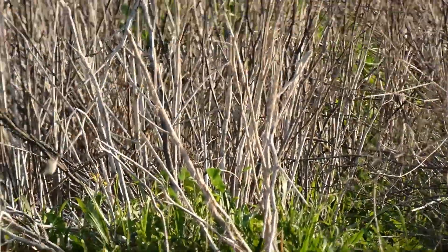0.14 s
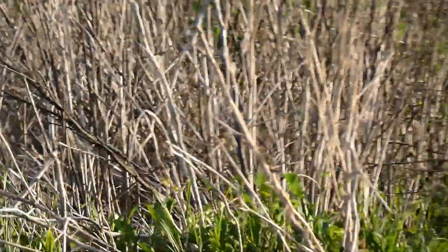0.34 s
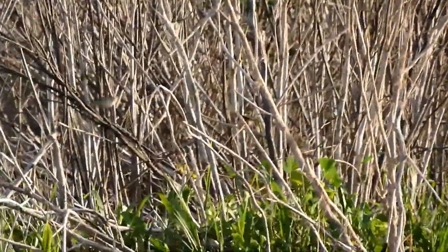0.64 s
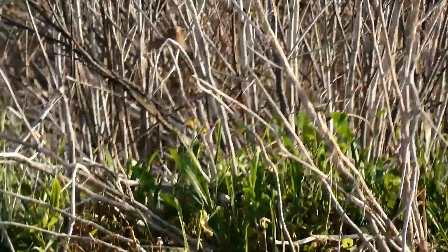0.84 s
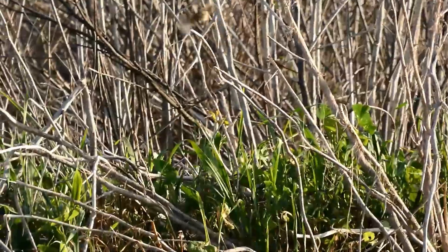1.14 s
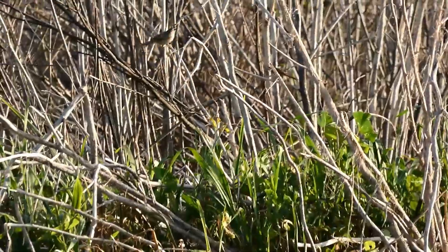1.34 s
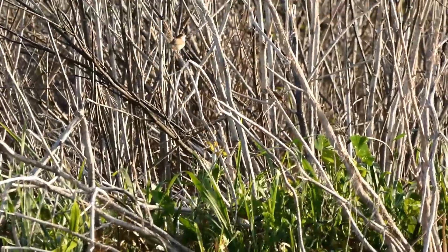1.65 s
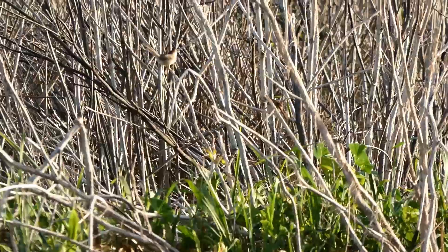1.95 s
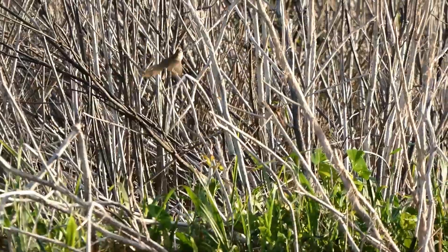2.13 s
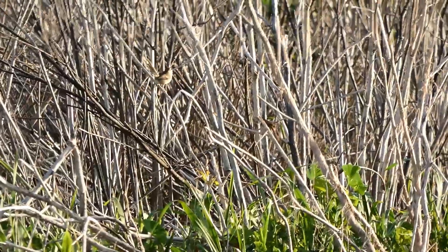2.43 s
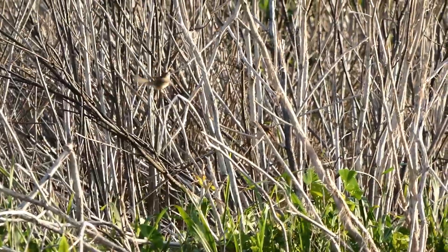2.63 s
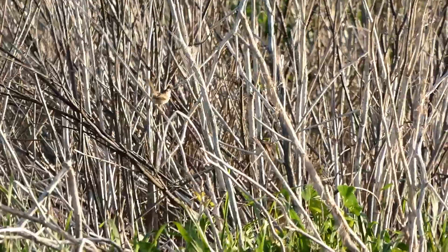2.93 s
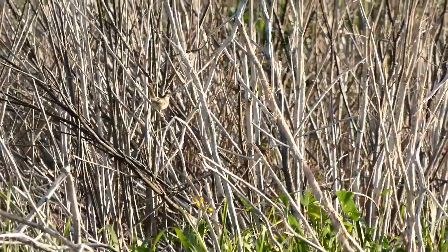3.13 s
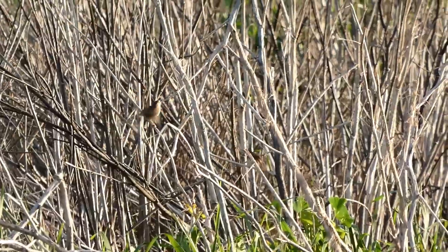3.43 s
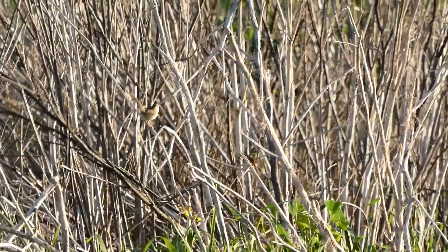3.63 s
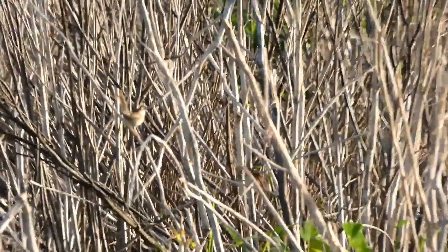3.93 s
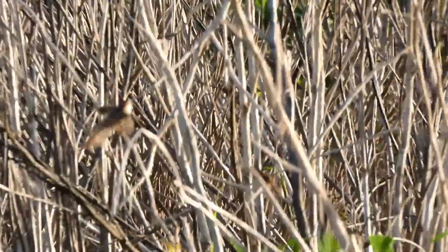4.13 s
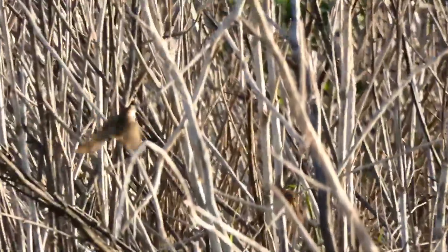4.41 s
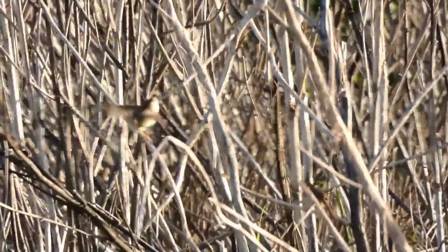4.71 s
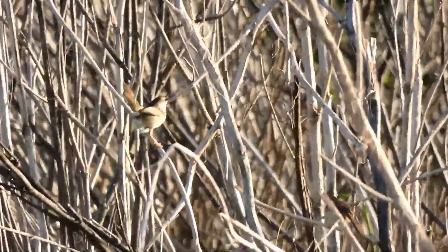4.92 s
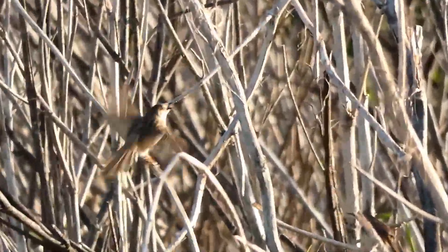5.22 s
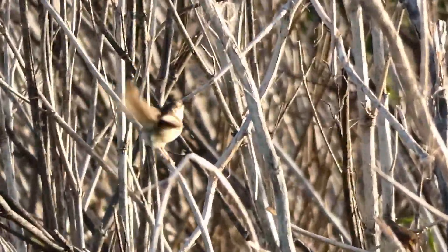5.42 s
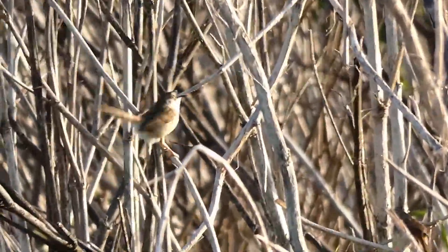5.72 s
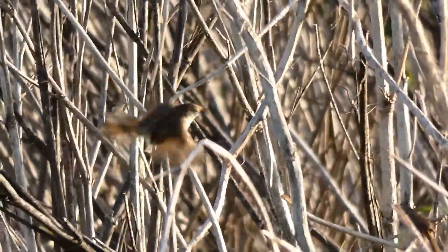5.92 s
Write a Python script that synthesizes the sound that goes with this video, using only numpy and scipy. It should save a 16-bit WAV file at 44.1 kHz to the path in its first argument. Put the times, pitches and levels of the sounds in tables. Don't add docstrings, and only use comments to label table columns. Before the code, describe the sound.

A small bird repeats a fast, high trilling phrase in a dry reedbed, while close camera lens motors tick, hum and whirr over faint open air.

```python
import sys
import numpy as np
from scipy import signal
from scipy.fft import rfft, irfft
from scipy.io import wavfile
from scipy.ndimage import uniform_filter1d

SR = 44100
rng = np.random.default_rng(int(sys.argv[2]) if len(sys.argv) > 2 else 0)


def invert_db(x):
    u = np.asarray(x, float) / 20
    return 10 ** u


def generate_wav(signal):
    frames = np.transpose(np.atleast_2d(signal))
    scaled = np.clip(frames, -1, 1) * 32767
    pcm = np.round(scaled).astype(np.int16)
    wavfile.write(sys.argv[1], SR, pcm)


N = 267246
CLOCK = np.arange(N) / SR
RUN_OUT_S = 4.9

# (frequency [Hz], density [dB per Hz])
AIR_COLOUR = [(25, -19), (150, -11.5), (240, -6.5), (373, 0.5), (936, -8.5), (1190, -25), (1520, -13),
              (2410, -12.5), (3430, -10.5), (5280, -11), (7500, -5.5), (10000, -18.5), (13000, -22.5),
              (15500, -28), (17000, -34)]
# (frequency [Hz], likeness [0..1])
AIR_LIKENESS = [(60, 0.49), (180, 0.88), (550, 0.85), (1650, 0.17), (4970, 1), (15000, 0.26)]
# (frequency [Hz], width [Hz], level [dB])
ENGINES = [(143.7, 7.5, -73.5), (137.4, 69, -71)]

# (frequency [Hz], width [Hz], tick level [dB], tick level with lens run out [dB], motor hum level [dB])
HOUSING_MODES = [(1187.2, 76.6, -2, -1, 33), (1252, 77, -2.5, -3, -17), (1336.6, 39, -1.5, 8.5, 17),
                 (1021, 71, -9.5, 5.5, -29), (1710, 84, 5, -16, 16)]
# (frequency [Hz], width [Hz], tick level [dB], zoom motor level [dB])
LENS_MODES = [(2432, 115, 2.5, 3.5), (2836, 36, 0.5, 15), (2915, 30, -14, 15.5), (3106, 214, -8, 2.5),
              (4508, 71, -9, 2.5), (4220, 790, -10.5, -57), (2080, 740, -23, -47), (9930, 520, -14.5, -42),
              (2590, 352, -1.5, -12)]
# (frequency [Hz], width [Hz], level [dB])
BARREL_MODES = [(301.4, 82, 11.5), (447, 14, 13.5), (572.4, 9.8, 10), (740, 27, -39)]
# (frequency [Hz], width [Hz], level [dB])
STEP_MODES = [(396, 65, -14.5), (494, 98, -15.5), (640, 230, -16.5), (900, 135, -13.5), (1748, 230, -9),
              (2740, 293, -9)]
# (frequency [Hz], width [Hz], level [dB])
RUN_OUT_HUM_MODES = [(1305, 55, -59.5), (1097, 40, -64.5)]

# (time [s], housing hum level [dB])
MOTOR_LOAD = [(0.0, -60), (.15, -57), (.25, -40.5), (.29, -49.5), (.81, -55.5), (.89, -49), (.93, -58.5),
              (1.3, -66), (3.5, -63), (3.8, -52.5), (3.88, -43.5), (4.08, -49), (4.29, -58), (4.46, -55.5),
              (4.62, -57), (4.89, -50.5), (5.03, -68), (6.06, -64)]
# (start [s], stop [s], rise [s], surge level [dB], cruise level [dB])
ZOOM_RUNS = [
    (0.171, 0.765, 0.3, -46.5, -49.5),
    (3.833, 4.824, 0.011, -34.5, -49.5),
]
# (time [s], rate [steps/s])
MOTOR_SPEED = [
    (0, 120),
    (2.0, 91),
    (3.8, 56),
    (4.3, 280),
    (6.1, 670),
]
# (time [s], level [dB])
GEAR_BITE = [(.2, -7), (.33, 0.5), (.37, -2), (.45, 2.5), (.55, 2), (.64, 1), (.68, -9), (.75, 4),
             (3.85, -3), (3.95, -0.5), (4.05, 2), (4.15, -3), (4.3, -0.5), (4.45, 0.5), (4.6, -6),
             (4.8, -3)]
# (time [s], level [dB])
UPPER_LENS_SLACK = [(0, -4.5), (3.8, 2), (3.83, 9.5), (4.45, 2), (4.6, 7.5)]
# (time [s], level [dB])
BARREL_CATCHES = [
    (.24, -55),
    (0.45, -52.5),
    (0.558, -54),
    (.75, -60.5),
    (3.86, -45),
    (4.08, -51.5),
    (4.301, -63),
    (4.42, -52),
    (4.79, -54),
]

# (time [s], peak level [dB])
FOCUS_HUNT = [(0.8414, -43), (0.857, -38), (0.8792, -33), (0.8993, -42), (0.9401, -36), (0.9726, -32.5),
              (1.007, -37), (1.0398, -33), (1.1416, -37), (1.173, -33), (1.375, -38.5), (1.4406, -31.5),
              (1.509, -39.5), (1.5403, -31), (1.642, -40), (1.6747, -30), (1.775, -40), (1.808, -30),
              (1.941, -37.5), (2.0722, -33), (2.1012, -36.5), (2.132, -29), (2.2016, -37), (2.267, -30),
              (2.3004, -49), (2.334, -36.5), (2.366, -27.5), (2.4002, -35.5), (2.4679, -28.5),
              (2.5005, -35.5), (2.5674, -29.5), (2.6348, -36.5), (2.667, -27.5), (2.8025, -36.5),
              (2.8334, -29), (2.866, -35), (2.899, -29.5), (2.9337, -38.5), (3.0011, -31), (3.034, -37.5),
              (3.1, -29.5), (3.1347, -37.5), (3.234, -29), (3.268, -36.5), (3.3342, -30), (3.4022, -40),
              (3.4344, -30), (3.469, -37)]
FOCUS_CREEP = [(0.125, -40.5), (0.1866, -34.5), (0.2202, -36.5), (0.288, -42), (0.3887, -45), (0.421, -52),
               (0.4972, -45), (0.539, -42), (0.567, -46), (0.6872, -47), (0.726, -46), (0.79, -44),
               (0.822, -46), (3.548, -38), (3.5761, -37.5), (3.606, -41), (3.639, -31), (3.6722, -34.5),
               (3.7062, -35), (3.7404, -29.5), (3.7738, -32), (3.8064, -29.5), (3.9084, -38), (4.0117, -43),
               (4.0702, -48), (4.1337, -47), (4.277, -45), (4.5465, -43), (4.7488, -44), (4.784, -44),
               (4.818, -40), (4.8516, -48), (4.896, -39), (4.9219, -32.5), (4.953, -42.5)]
FOCUS_STRAIN = [(0.0563, -33), (0.2552, -33), (0.3197, -37.5), (.354, -37.5), (0.6462, -39), (3.8366, -27),
                (3.8764, -33), (3.9313, -33), (3.9739, -34.5), (4.043, -30), (4.091, -41), (4.308, -49)]
FOCUS_REACH = [(5.0983, -42), (5.157, -38), (5.189, -37), (5.2869, -38.5), (5.3616, -35.5), (5.4279, -36.5),
               (5.465, -38.5), (5.499, -37.5), (5.564, -39), (5.663, -38), (5.697, -40), (5.7297, -37.5),
               (5.8314, -39.5), (5.928, -38.5), (5.962, -39.5)]
STEP_BRIGHTNESS = [-15, -21.5, -12.5, -10]

# (whistle peak [s], whistle level [dB], rising note level [dB])
FAR_SONG = [(0.142, -48, -46.5), (0.4239, -54, -57), (0.715, -50.5, -56), (1.0006, -42, -47),
            (1.299, -42, -48), (1.592, -64, -57), (1.8932, -38.5, -44), (2.173, -38.5, -43),
            (2.462, -40, -45), (2.745, -37.5, -42), (3.0402, -39.5, -45), (3.325, -43, -43),
            (3.615, -47.5, -39.5), (3.904, -36, -40), (4.1895, -39.5, -39), (4.489, -35, -42),
            (4.7784, -41, -45), (5.066, -32.5, -38), (5.371, -37, -42)]
# (start from whistle peak [s], length [s], start, middle, end pitch [Hz], level [dB])
FAR_RATTLE_NOTES = [
    (-.05, .005, 4800, 5500, 5900, -15),
    (-.043, .005, 5800, 5000, 4300, -17),
    (-.037, .006, 4800, 3900, 4200, -9),
    (-.029, .007, 4800, 3850, 4000, -7),
]

# (time [s], level [dB], frequency [Hz], decay [s])
HOUSING_KNOCKS = [
    (0.182, -33.5, 640, 0.0033),
    (0.234, -25.5, 610, 0.0056),
    (0.166, -40.5, 344, 0.013),
    (0.232, -28.5, 335, 0.0072),
    (3.834, -23.5, 425, 0.0063),
    (4.034, -55, 900, 0.0059),
]

# (middle [s], length [s], level [dB])
STEM_GUSTS = [(1.29, 0.033, -55), (1.492, 0.15, -55.5), (1.644, 0.11, -56.5), (2.067, 0.054, -58),
              (2.194, 0.048, -52), (2.317, 0.14, -56.5), (2.571, 0.11, -56.5), (2.931, 0.16, -50),
              (3.268, 0.15, -56.5), (3.407, 0.15, -60.5), (3.653, 0.14, -60.5), (3.922, 0.17, -50),
              (4.8, 0.32, -61), (5.06, 0.058, -61), (5.238, 0.078, -52.5), (5.57, 0.15, -58),
              (6.025, 0.031, -73)]
# (frequency [Hz], level [dB])
RUB_COLOUR = [(2500, -60), (4000, -32), (6000, -16.5), (9900, -12.5), (12500, -19), (15000, -31),
              (17000, -52)]
# (time [s], level [dB], left over right [dB])
STEM_CRACKS = [(0.181, -29.5, -1), (0.2364, -35, -1), (0.6469, -28, 1), (1.193, -20.5, -3.5),
               (1.276, -43, -3), (1.291, -33, -5), (1.099, -50, -2), (1.208, -37, -3), (1.626, -37, -2),
               (1.643, -44, 0), (1.6627, -31.5, -4), (1.717, -43, -4), (1.959, -43, -5),
               (1.7562, -29.5, -4), (2.0373, -39, -7), (2.07, -42, -3.5), (2.177, -46, -7),
               (2.1936, -28, -4), (2.212, -30, -4), (2.2595, -41, -5), (2.881, -35, -5), (2.918, -27, -5),
               (2.942, -34, -12), (2.983, -40.5, -8), (3.836, -30, -2), (4.0348, -25, 3), (4.091, -30, -1),
               (4.667, -33, -5), (4.715, -38, -4), (4.7984, -42, -2), (4.805, -40, -5), (4.809, -44, -3),
               (4.831, -32, -6), (4.837, -40, -6), (4.846, -47, -4), (4.962, -51, 0), (5.563, -37, -4),
               (4.8844, -38, -3.0), (5.0757, -32.5, -6), (5.553, -34, -5), (5.638, -39.5, -2.5),
               (6.02, -42, -6), (6.034, -44, -6), (6.057, -38, -2)]

# (start [s], length [s], frequency [Hz], level [dB])
BARREL_GROANS = [(0.308, 0.11, 617, -56.5), (0.38, 0.11, 292, -58), (0.447, 0.085, 402.4, -54.5),
                 (0.51, 0.067, 567, -52.5), (0.529, 0.097, 317.7, -49.5), (.565, 0.053, 457, -50),
                 (0.641, 0.11, 452, -53.5), (0.672, 0.063, 600, -56), (0.744, 0.034, 352, -50),
                 (0.802, 0.25, 635, -58.5), (3.469, 0.021, 312, -52.5), (3.529, 0.14, 638, -56),
                 (3.524, 0.092, 278, -55), (3.684, 0.087, 627, -60), (3.85, 0.12, 313, -42),
                 (3.898, .1, 428.6, -49), (4.004, 0.025, 568, -45), (4.04, 0.082, 490, -49.5),
                 (4.072, 0.044, 289, -58), (4.123, 0.071, 418, -51.5), (4.137, 0.043, 281, -50.5),
                 (4.301, 0.096, 305.5, -48), (4.414, 0.047, 591, -46.5), (4.496, 0.1, 315, -47.5),
                 (4.726, 0.092, 432, -58), (4.79, 0.04, 315, -56), (4.834, 0.14, 617, -51.5)]

# (first pulse [s], last pulse [s], pulses [count])
TRILL_BOUTS = [
    (.8375, 1.0125, 10),
    (1.2228, 1.4495, 12),
    (4.4625, 4.667, 11),
    (4.9475, 5.205, 13),
]
# (first pulse level [dB], full level [dB], full pitch [Hz])
TRILL_VOICE = [
    (-46, -37, 4130),
    (-45, -35.5, 4115),
    (-45, -37, 3990),
    (-37, -31, 4150),
]

# (first snap [s], trill level [dB], snaps level [dB], whistle level [dB])
NEAR_SONG = [(1.4948, -25, -25.5, -27), (1.861, -25.5, -25.5, -27.5), (2.227, -23.5, -26.5, -29.5),
             (2.5939, -23, -23.5, -29.5), (2.958, -24, -25, -29), (3.3236, -23.5, -24.5, -29),
             (3.6884, -22.5, -24.5, -28.5), (4.0509, -23, -22.5, -29.5), (4.416, -22, -24, -28),
             (4.7814, -22, -21.5, -28), (5.147, -20.5, -21, -24), (5.513, -21, -22, -26),
             (5.877, -18.5, -21, -25.5)]
RATTLE_EFFORT = [6.5, 7, 8, 5, 1, 5, 5, -4, -0.5, -2, 0, 4.5, 5]
# (start from first snap [s], length [s], start, middle, end pitch [Hz], level [dB])
SNAP_NOTES = [
    (-.017, .014, 6650, 6900, 7050, -25),
    (-.002, .0035, 5000, 6300, 7200, -1),
    (.004, .0035, 6700, 5900, 4700, -5),
    (.0185, .005, 4100, 5050, 5900, -12),
    (.025, .0045, 5900, 4800, 3700, -19),
    (.034, .006, 5700, 3900, 4900, -24),
    (.0445, .007, 5700, 3850, 4800, -20),
    (.055, .007, 5500, 3900, 4800, -16),
]

# (frequency [Hz], width [Hz], level [dB])
PORT_NOTCHES = [(2170, 150, -8), (3420, 360, -13), (7450, 1300, -21)]


def evened(x):
    return x / np.sqrt(np.mean(x ** 2) + 1e-20)


def smooth(x, size):
    return uniform_filter1d(uniform_filter1d(x, size=size), size=size)


def read(points, hz):
    f, value = np.transpose(points)
    return np.interp(np.log(hz + 1), np.log(f + 1), value)


def over_time(table):
    return np.interp(CLOCK, *np.transpose(table))


def add(mix, s, sound):
    part = mix[max(round(s * SR), 0):][:len(sound)]
    part += sound[:len(part)]


def ring(x, hz, width):
    for wide in (abs(width), 3 * abs(width)):
        pole = np.exp((-np.pi * wide + 2j * np.pi * hz) / SR)
        x = 2 * signal.lfilter([1 - abs(pole)], [1, -pole], x).real
    return x


def sway(x, hz, width):
    drift = evened(smooth(rng.standard_normal(N), 2500))
    turn = np.exp(2j * np.pi * np.cumsum(hz * (1 + .004 * drift)) / SR)
    x = x / turn
    for wide in (abs(width), 3 * abs(width)):
        r = np.exp(-np.pi * wide / SR)
        x = signal.lfilter([1 - r], [1, -r], x)
    return 2 * (x * turn).real


def coloured(spectrum, same, patchy_db, size):
    hz = np.fft.rfftfreq(size, 1 / SR)
    a, b, c, d, patches = rng.standard_normal((4 * N // size + 5, len(hz), 5)).T
    patches = uniform_filter1d(patches, size=8, axis=0)
    patches = evened(uniform_filter1d(patches, size=8, axis=1))
    same = np.clip(same(hz), -1, 1)[:, None]
    left = a + 1j * b
    right = same * left + np.sqrt(1 - same ** 2) * (c + 1j * d)
    z = np.array([left, right]) * invert_db(read(spectrum, hz)[:, None] + patchy_db * patches)
    return evened(signal.istft(z, nperseg=size, noverlap=size - size // 4)[1][:, :N])


def voiced(hz):
    return np.sin(2 * np.pi * (np.cumsum(hz) / SR + rng.random()))


def note(length, hz0, hz1, hz2, db, peak=0.5, blunt=1.0):
    u = np.linspace(0, 1, max(round(length * SR), 8))
    bend = np.polyfit([0, .5, 1], [hz0, hz1, hz2], 2)
    hz = np.polyval(bend, u) * (1 + 0.006 * rng.normal())
    rise_fall = np.interp(u, [0, np.clip(peak, .05, .95), 1], [0, 1, 0])
    return invert_db(db) * np.sin(np.pi / 2 * rise_fall) ** blunt * voiced(hz)


def reeds(x, t60, early):
    at = np.arange(40, SR // 2 - 30, 24) + rng.integers(0, 24, (2, (SR // 2 - 71) // 24 + 1))
    taps, t = np.zeros((2, SR // 2)), CLOCK[:SR // 2]
    np.put_along_axis(taps, at, rng.choice([-1., 1.], at.shape), 1)
    taps = taps[:1] + 0.11 * taps[1:] * [[1], [-1]]
    taps *= invert_db(-60 * t / t60) + early * np.exp(-t / 0.014)
    return signal.fftconvolve(x[None], taps / np.linalg.norm(taps[0]), axes=1)[:, :N]


def air():
    hush = invert_db(-58.5) * coloured(AIR_COLOUR, lambda hz: read(AIR_LIKENESS, hz), patchy_db=2.4, size=2048)
    drone = sum(invert_db(db) * evened(ring(rng.standard_normal(N), hz, width)) for hz, width, db in ENGINES)
    return hush + drone


def motor_hum(grind, lumps):
    load_db = over_time(MOTOR_LOAD)
    shell = evened(sum(invert_db(db) * ring(lumps * grind[1], hz, width) for hz, width, *_, db in HOUSING_MODES))
    pair = lumps * (grind[3] + 0.29 * grind[4] * np.array([[1], [-1]]))
    murmur = evened(ring(pair, 471, 270) + ring(pair, 573.0, 62) + 0.91 * ring(pair, 754, 75))
    run_out = sum(invert_db(db) * evened(ring(lumps * grind[0], hz, width)) for hz, width, db in RUN_OUT_HUM_MODES)
    murmur_db = -63 + 0.81 * (load_db + 60.5)
    return (CLOCK > RUN_OUT_S) * run_out + invert_db(load_db) * shell + invert_db(murmur_db) * murmur


def effort():
    out = np.zeros(N)
    for start, stop, rise, surge_db, cruise_db in ZOOM_RUNS:
        sinking_db = surge_db - 31 * np.maximum(CLOCK - start - rise, 0)
        db = np.maximum(sinking_db, cruise_db)
        db -= 9 * np.clip(1 - (CLOCK - start) / rise, 0, 1)
        out += invert_db(db) * (CLOCK > start) * np.clip((stop - CLOCK) / 0.0066, 0, 1)
    return out


def catches():
    rise_db_s, fall_db_s = 304, 89
    swell = sum(invert_db(db - np.maximum(rise_db_s * (s - CLOCK), fall_db_s * (CLOCK - s)))
                for s, db in BARREL_CATCHES)
    return swell * (effort() > 0)


def zoom(grind, lumps):
    turns = np.cumsum(over_time(MOTOR_SPEED)) / SR
    steps = np.exp(-(turns % 1) / 0.35) * grind[0] + .9 * grind[1]
    slack = invert_db(over_time(UPPER_LENS_SLACK))
    whine = np.zeros(N)
    for k, (hz, width, _, db) in enumerate(LENS_MODES[:5]):
        mode = sway(steps, hz, max(width, 30 + 45 * (hz > 4000)))
        damping = slack if 3000 < hz < 3300 else 1
        whine += invert_db(db) * np.roll(lumps, 9000 * k) ** .3 * damping * mode
    drone = evened(sum(invert_db(db) * ring(grind[2], hz, width) for hz, width, db in BARREL_MODES))
    hiss = coloured(RUB_COLOUR, lambda hz: .75 + 0 * hz, patchy_db=.8, size=256)
    hiss += 0.15 * evened(ring(grind[4], 15300, 500))
    whirr = effort() * invert_db(over_time(GEAR_BITE)) * evened(whine)
    return whirr + catches() * drone + invert_db(-39.5) * effort() ** 0.42 * hiss


def lens_motors():
    grind = rng.standard_normal((5, N))
    lumps = invert_db(2.5 * evened(uniform_filter1d(grind[2], size=1500)))
    return motor_hum(grind, lumps) + zoom(grind, lumps)


def focus_steps():
    kinds = zip((FOCUS_HUNT, FOCUS_CREEP, FOCUS_STRAIN, FOCUS_REACH), STEP_BRIGHTNESS)
    return [(s + 0.001039, db + 2.5, bright_db) for table, bright_db in kinds for s, db in table]


def focus():
    shove, tick = np.zeros(N), np.zeros(N)
    t = np.arange(0, .014, 1 / SR)
    for s, db, bright_db in focus_steps():
        chance = rng.standard_normal(len(t))
        buzz = np.sin(2 * np.pi * 1200 * t) + 0.5 * chance
        add(shove, s - .005, invert_db(db + 4.0) * buzz * (t / 0.0038) ** 2 * np.exp(2 - t / 0.0017))
        add(tick, s - .0027, invert_db(db + bright_db + 22.0) * chance * t / 0.0032 * np.exp(1 - t / 0.0014))
    out = np.zeros(N)
    for hz, width, db, out_db, _ in HOUSING_MODES:
        out += ring(shove * invert_db(np.where(CLOCK < RUN_OUT_S, db, out_db)), hz, width)
    blow = np.roll(tick, 50) + 0.39 * np.roll(tick, 350)
    for hz, width, db in STEP_MODES:
        out += invert_db(db + 9.0) * ring(blow, hz, width)
    for hz, width, db, _ in LENS_MODES:
        out += invert_db(db) * ring(tick, hz, width)
    return out


def far_bird():
    out = np.zeros(N)
    for s, whistle_db, rise_db in FAR_SONG:
        add(out, s - .088, note(.027, 6050, 6280, 6550, rise_db, peak=.6, blunt=1.3))
        for at, length, hz0, hz1, hz2, db in FAR_RATTLE_NOTES:
            add(out, s + at, note(length, hz0, hz1, hz2, db + whistle_db, blunt=0.38))
        add(out, s - .018, note(0.0249, 5413, 5180, 5120, whistle_db, peak=0.91, blunt=1.3))
    return out


def knocks():
    out, t = np.zeros(N), np.arange(0, .06, 1 / SR)
    for s, db, hz, decay in HOUSING_KNOCKS:
        thud = np.sin(2 * np.pi * hz * t) + 0.9 * ring(rng.standard_normal(len(t)), 580, 1650)
        add(out, s, invert_db(db) * thud * t / decay * np.exp(1 - t / decay * 2))
    return out - smooth(out, 150)


def gusts():
    out = np.zeros(N)
    for s, length, db in STEM_GUSTS:
        add(out, s - length * .7, invert_db(db) * np.hanning(round(length * 1.4 * SR)))
    return out


def stems():
    grain_db = 1.6 * uniform_filter1d(rng.exponential(1, N) ** 2, size=30)
    flutter_db = 4 * evened(ring(rng.standard_normal(N), 40, 60))
    rub = coloured(RUB_COLOUR, lambda hz: 0.61 + 0 * hz, patchy_db=3.0, size=256)
    rub = evened(invert_db(grain_db + flutter_db) * rub)
    out = rub * gusts() * invert_db(np.array([[-1.3], [1.3]]))
    t = np.arange(0, .004, 1 / SR)
    for s, db, pan_db in STEM_CRACKS:
        chance = rng.standard_normal((2, len(t)))
        burst = (chance[0] + .5 * chance[1] * [[1], [-1]]) * np.exp(-t / 0.0006)
        snap = ring(burst, 9700, 3600)
        add(out[0], s, invert_db(db + pan_db / 2) * snap[0])
        add(out[1], s, invert_db(db - pan_db / 2) * snap[1])
    return out


def groans():
    out = np.zeros(N)
    for s, length, hz, db in BARREL_GROANS:
        tone = note(length, hz * .99, hz * 1.01, hz * 0.957, db, peak=0.25, blunt=0.41)
        waver_db = 4.9 * evened(uniform_filter1d(rng.standard_normal(len(tone)), size=400))
        add(out, s, tone * invert_db(waver_db))
    return out


def third_bird():
    out = np.zeros(N)
    for (first, last, count), (first_db, full_db, full_hz) in zip(TRILL_BOUTS, TRILL_VOICE):
        count = int(count)
        times = np.linspace(first, last, count) + 0.00037 * rng.standard_normal(count)
        for k, s in enumerate(times):
            s += .0025 * (k == 0)
            db = full_db + (first_db - full_db) * np.exp(-k) + .5 * rng.normal()
            hz = full_hz * (1 - .075 * np.exp(-k / 2.2) + .006 * rng.normal())
            add(out, s - .0045, note(.0095, .83 * hz, 1.01 * hz, .85 * hz, db, blunt=1.5))
            add(out, s - .009, note(.006, .92 * hz, 1.05 * hz, 1.3 * hz, db - 19))
            add(out, s + .003, note(.005, 1.25 * hz, 1.03 * hz, .9 * hz, db - 19))
            rasp = ring(rng.standard_normal(1150), 4900, 1350) * np.hanning(1150)
            add(out, s - .0235, invert_db(db - 2.0) * rasp)
    return out


def trill_pulse(db):
    t = np.arange(0, .0112, 1 / SR)
    hz = 5460 + 1500 * np.exp(-t / .0012) - 900 * np.exp(-t / .0004) + 20 * rng.normal()
    flutter = 1 + .12 * np.sin(2 * np.pi * (230 * t + rng.random()))
    swell = signal.windows.tukey(len(t), .4) * (.9 + 10 * t) * flutter
    return invert_db(db) * swell * voiced(hz)


def near_bird():
    out = np.zeros(N)
    for (s, trill_db, snaps_db, whistle_db), rattle_db in zip(NEAR_SONG, RATTLE_EFFORT):
        for k in range(9):
            below_db = k * (2.3 + k * .27)
            add(out, s - .0315 - k * .0135, trill_pulse(trill_db - below_db + .7 * rng.normal()))
        for at, length, hz0, hz1, hz2, db in SNAP_NOTES:
            effort_db = rattle_db if at > .01 else 2.5
            db = db + snaps_db + effort_db + 1.5 * rng.normal()
            add(out, s + at, note(length, hz0, hz1, hz2, db, blunt=2.5))
        whistle = s + .087
        add(out, whistle - .0235, note(.028, 5450, 5250, 5080, whistle_db + 1, peak=.8, blunt=2.2))
        add(out, whistle + 0.0026, note(0.003, 5000, 4910, 6000, whistle_db - 7.5, blunt=0.75))
        add(out, whistle + 0.0056, note(0.0085, 5520, 4910, 5300, whistle_db - 17.5, peak=0.11))
    return out


def scene():
    body = focus() + knocks() + groans()
    uneven = .09 * np.roll(body, 9) * [[1], [-1]]
    far, third, near = far_bird(), third_bird(), near_bird()
    birds = far + invert_db(-5) * reeds(far, t60=.3, early=.6)
    birds += third + invert_db(-11) * reeds(third, t60=.3, early=.05)
    birds += near + invert_db(-8) * reeds(near, t60=0.27, early=1.0)
    return air() + lens_motors() + body + uneven + stems() + birds


def roll_off(x):
    return signal.sosfilt(signal.butter(12, 16650, fs=SR, output="sos"), x)


def record(dry):
    hz = np.fft.rfftfreq(N, 1 / SR)
    ports_db = sum(db / (1 + ((hz - at) / width * 2) ** 2) for at, width, db in PORT_NOTCHES)
    wind_cut = 1 / np.sqrt(1 + (60 / (hz + 1)) ** 2)
    band_limit = 1 / np.sqrt(1 + (hz / 15780) ** 600)
    mix = irfft(rfft(dry) * invert_db(ports_db) * wind_cut * band_limit, N)
    return roll_off(mix)


dry = scene()
out = record(dry)
generate_wav(out)
```